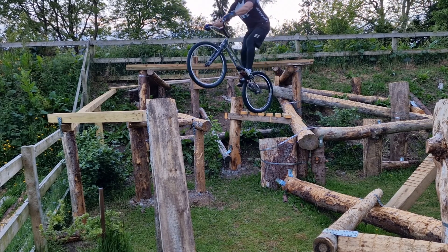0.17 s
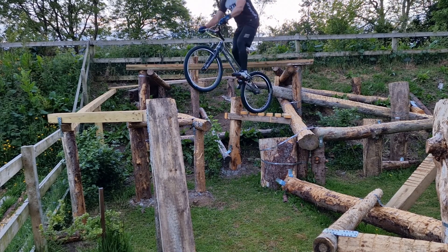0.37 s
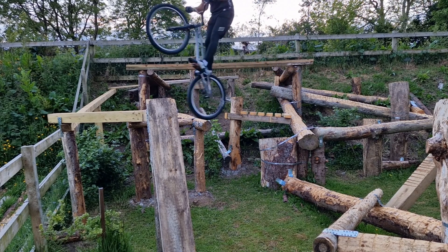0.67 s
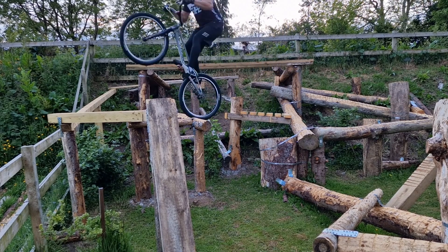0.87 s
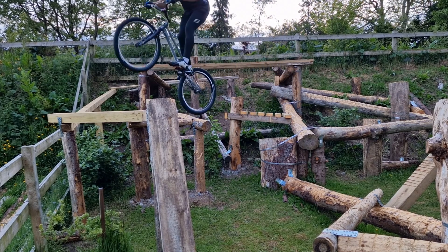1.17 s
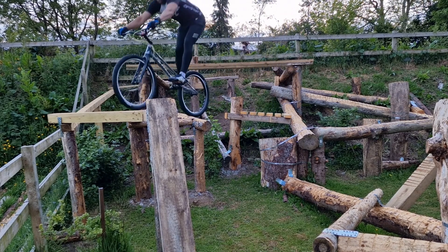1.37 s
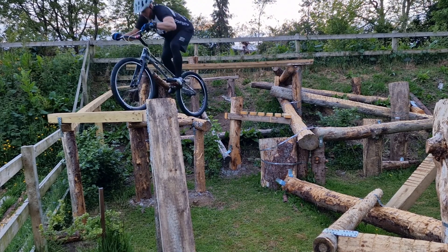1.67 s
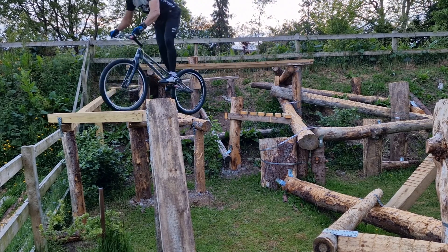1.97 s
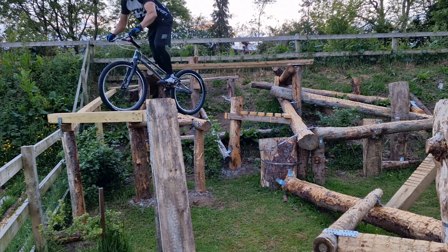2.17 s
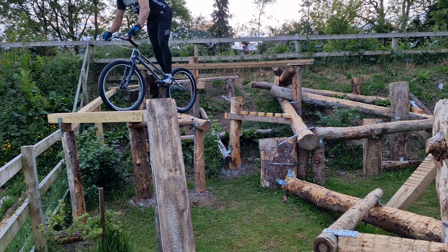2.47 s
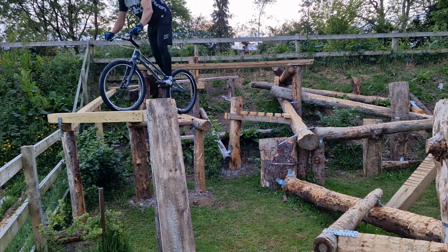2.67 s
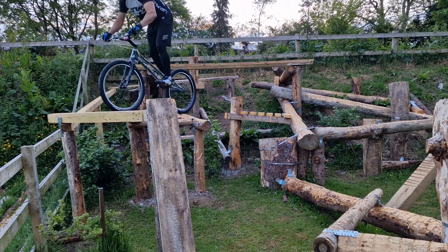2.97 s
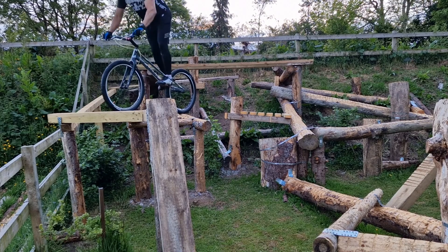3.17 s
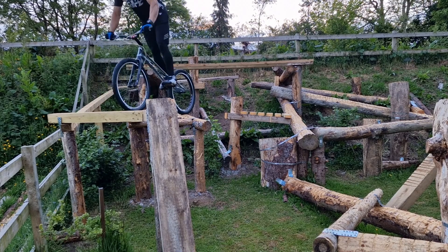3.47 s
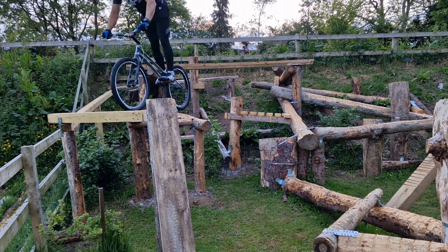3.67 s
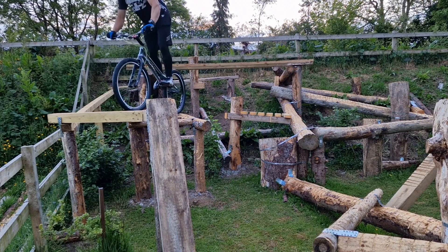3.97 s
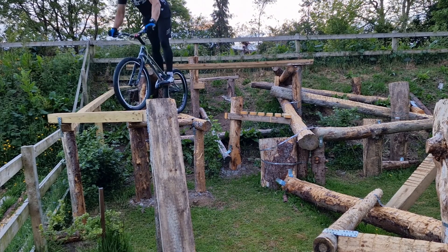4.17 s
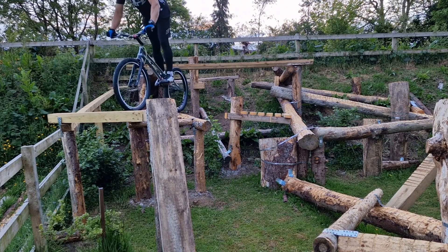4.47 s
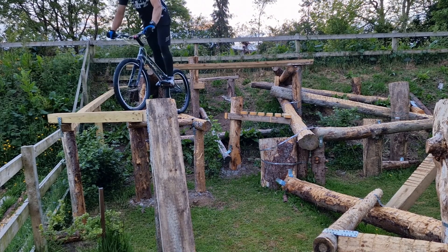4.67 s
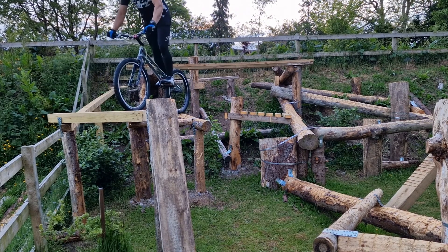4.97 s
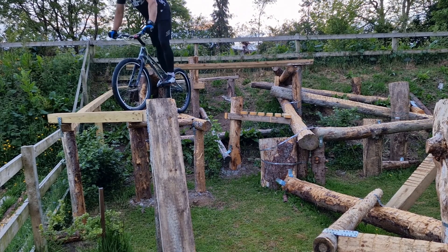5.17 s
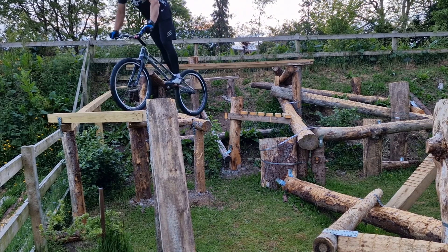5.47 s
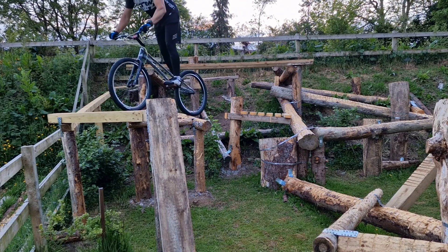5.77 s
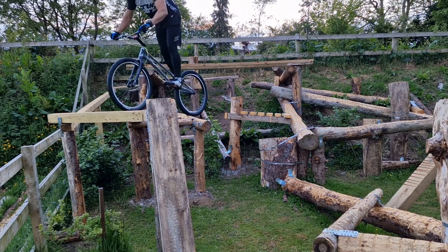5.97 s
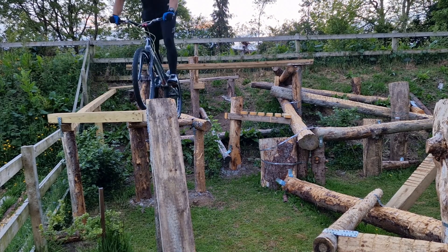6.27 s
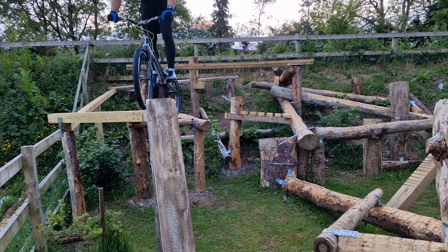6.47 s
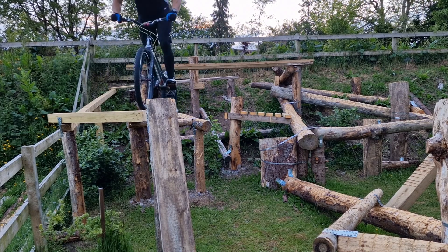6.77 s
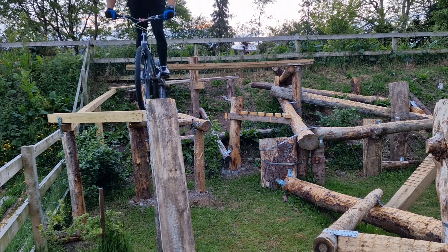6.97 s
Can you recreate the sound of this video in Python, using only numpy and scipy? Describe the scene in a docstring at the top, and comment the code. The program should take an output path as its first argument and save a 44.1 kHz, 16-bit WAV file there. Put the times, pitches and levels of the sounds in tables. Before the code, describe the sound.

Bike tyres thump and scuff on timber amid ratchet clicks and brief brake squeaks, with birdsong and soft leaves in a garden.

```python
"""A trials bicycle hops along timber beams in a garden. Over far traffic and leaves, the tyres thump and scuff
on wood and the freewheel ticks; a pedal kick spins it into a whirr, cut off as the rim brakes grab and honk.
From 1.1 s a songbird sings gliding notes between the hops, with a high trill around 3 s. The hardest landing
comes at 5.6 s: a honk, a sharp slap of the chain, a scuff and a ringing beam. From 6.2 s a far engine hums,
under the last hops and a stutter of brakes."""
import sys
import numpy as np
from scipy import signal
from scipy.fft import rfft, irfft, next_fast_len
from scipy.io import wavfile

SR = 44100
rng = np.random.default_rng(int(sys.argv[2]) if len(sys.argv) > 2 else 0)


def wav_out(sig):
    """Save sig, one row per channel (or a flat mono array), as 16-bit PCM at SR to the path in sys.argv[1]."""
    wavfile.write(sys.argv[1], SR, np.round(np.clip(np.atleast_2d(sig).T, -1, 1) * 32767).astype(np.int16))


N = 313992
T = np.arange(N) / SR
SIDES = np.array([[1], [-1]])   # adds to the left, subtracts from the right


def from_db(db):
    """Decibels to gain."""
    return 10 ** (np.asarray(db) / 20)


def at_hz(curve, hz):
    """Read a curve on a log frequency axis."""
    curve_hz, values = np.transpose(curve)
    return np.interp(np.log(hz), np.log(curve_hz), values)


def filtered(x, order, hz, kind):
    """Butterworth filter."""
    return signal.sosfilt(signal.butter(order, hz, kind, fs=SR, output="sos"), x)


def noise(eq):
    """Noise of unit power, coloured by a minimum-phase EQ."""
    hz = np.maximum(np.arange(4097) * SR / 8192, 10)
    cepstrum = irfft(at_hz(eq, hz) * np.log(10) / 20)
    cepstrum[1:4096] *= 2
    cepstrum[4097:] = 0
    kernel = irfft(np.exp(rfft(cepstrum)))
    return signal.fftconvolve(rng.standard_normal(N), kernel / np.sqrt(np.sum(kernel ** 2)))[:N]


def drift(per_s):
    """Random modulator: ramps between values of spread 1."""
    knots = np.arange(0, T[-1] + 1, 1 / per_s)
    return np.interp(T, knots, rng.standard_normal(N // 20)[:len(knots)])


def decays(times, levels_db, t60, attack_s):
    """Sum of envelopes with a quick attack and an exponential decay."""
    out, t = np.zeros(N + SR), T[:int(1.5 * t60 * SR)]
    for s, level_db in zip(times, levels_db):
        out[round(s * SR):][:len(t)] += (1 - np.exp(-t / attack_s)) * from_db(level_db - 60 * t / t60)
    return out[:N]


def struck(modes, times, levels_db, tunings, attack_s):
    """Each blow rings every mode at a strength of its own; its tuning multiplies the mode pitches."""
    out, spread_db = np.zeros(N), rng.normal(0, 3.4, (len(times), len(modes)))
    for s, level_db, tuning, extras_db in zip(times, levels_db, tunings, spread_db):
        i = round(s * SR)
        t = T[:min(N - i, SR // 2)]
        for (pitch, mode_db, t60), extra_db in zip(modes, extras_db):
            envelope = from_db(level_db + mode_db + extra_db - 60 * t / t60) * (1 - np.exp(-t / attack_s))
            out[i:i + len(t)] += envelope * np.sin(2 * np.pi * pitch * tuning * t)
    return out


# Faders of the background bed: t/s, rumble level/dB, rustle level/dB
BED_FADERS = [(0.0, -62, -68), (0.46, -65, -65.5), (0.77, -60, -68.5), (1.76, -66, -69.5), (5.23, -64, -75),
              (6.84, -61, -69), (7.12, -65.5, -73)]
# EQ of the traffic rumble: f/Hz, level/dB
TRAFFIC_EQ = [(12, -44.5), (20, -2.5), (70, -3), (103, -12), (134, -16), (167, -31), (250, -29.5),
              (320, -58), (550, -120)]
# EQ of the leaf rustle: f/Hz, level/dB
LEAF_EQ = [(88, -10.5), (150, -11), (475, -8), (566, -10), (649, -10.5), (1310, -10.5), (6020, -28.5),
           (7470, -17.5), (9080, -37), (16000, -38.5)]
def traffic_and_leaves():
    """Far traffic rumbles almost in mono; leaves rustle wide, unrelated on the two sides."""
    s, rumble_db, rustle_db = np.transpose(BED_FADERS)
    rumble = noise(TRAFFIC_EQ) + 0.17 * noise(TRAFFIC_EQ) * SIDES
    rumble *= from_db(np.interp(T, s, rumble_db) + 0.97 * drift(16))
    rustle = np.array([noise(LEAF_EQ), noise(LEAF_EQ)])
    rustle *= from_db(np.interp(T, s, rustle_db) + 2.5 * drift(18))
    return rumble + rustle


# Tyres meeting timber: t/s, thump level/dB, thump f/Hz, scuff level/dB
TYRE_HITS = [(.037, -38.5, 122.8, -40), (0.458, -58, 80, -46.5), (0.568, -39.5, 124.4, -39.5),
             (.827, -38, 71.8, -32.5), (1.464, -49, 77, -34.5), (1.516, -31, 80.8, -39),
             (1.551, -38, 77.1, -39.5), (1.909, -56, 64.5, -44), (2.109, -44, 63, -33.5),
             (2.387, -58.5, 62.6, -48), (2.618, -40.5, 108.5, -44.5), (2.95, -67.5, 80, -61.5),
             (3.17, -67.5, 80, -57), (3.331, -56, 74.7, -45.5), (3.489, -37.5, 108.7, -36.5),
             (3.559, -43.5, 69.4, -42), (3.93, -42.5, 109.8, -44.5), (4.279, -76, 100, -44),
             (4.308, -50, 93, -64.5), (4.391, -64, 90, -61), (4.69, -47.5, 87.3, -56),
             (5.149, -70, 73.2, -61), (5.288, -73, 76, -57), (5.609, -39, 73.7, -21.5),
             (6.256, -46.5, 84.6, -43), (6.33, -42, 82.3, -48), (6.438, -49.5, 92, -51),
             (6.682, -37, 91.6, -28), (6.984, -46, 82.8, -46.5)]
# Modes of the logs: multiple of the thump pitch, level/dB, t60/s
LOG_MODES = [(.62, -4.5, 0.092), (.8, -5.5, 0.35), (1.0, -3.5, 0.22), (1.35, -1.5, .12), (1.9, -10, 0.16),
             (2.7, -15, 0.066)]
# EQ of rubber scuffing on wood: f/Hz, level/dB
SCUFF_EQ = [(120, -30), (200, -15), (579, -10), (777, -11.5), (3900, -9.5), (7830, -24), (11100, -29),
            (14900, -42), (16000, -28)]
def tyres():
    """A soft push rings the logs; the rubber scuffs, its bright edge ahead of its body."""
    s, thump_db, thump_hz, scuff_db = np.transpose(TYRE_HITS)
    thumps = struck(LOG_MODES, s, thump_db, thump_hz, attack_s=0.0029)
    rub = noise(SCUFF_EQ) * from_db(3.8 * np.clip(drift(120), -2, 2))
    low = filtered(rub, 2, 1800, "low")
    body = low * decays(s, scuff_db, t60=0.19, attack_s=0.016)
    edge = (rub - low) * decays(s, scuff_db - 8, t60=0.19, attack_s=0.0012)
    return thumps + body + edge


# EQ of the hub's metal: f/Hz, level/dB
HUB_EQ = [(290, -60), (500, -35.5), (729, -19), (843, -31.5), (1090, -25), (1380, -9), (1690, -11),
          (2890, 4), (3980, -3), (7530, -6), (10800, -4), (14900, -9), (16000, -10.5)]
def hub_noise():
    """The metallic hiss from which the ticks and the whirr are cut."""
    return noise(HUB_EQ)


def ticks(hiss, hits, top_db, body_db, t60):
    """Short bursts of hiss in three bands; top and body are trimmed against the middle."""
    s, level_db = np.transpose(hits)
    usual_db, body_follows = -37, 0.74   # the body follows only a share of a tick's strength
    body_level_db = usual_db + body_follows * (level_db - usual_db) + body_db
    body = filtered(hiss, 4, 4000, "low") * decays(s, body_level_db, t60, attack_s=0.000093)
    middle = filtered(hiss, 4, [4000, 10200], "band") * decays(s, level_db, t60, attack_s=0.00045)
    top = filtered(hiss, 6, 10200, "high") * decays(s, level_db + top_db, t60, attack_s=0.00099)
    return body + middle + top


# Freewheel pawls dropping over a tooth: t/s, level/dB
PAWL_DROPS = [(0.049, -35), (.072, -37), (0.0925, -32.5), (.1117, -37), (0.13, -37), (.1417, -33),
              (0.162, -38), (.173, -32.5), (0.1884, -34), (.2072, -38), (.2289, -30.5), (0.258, -36.5),
              (0.3236, -39.5), (0.5253, -54), (1.297, -37.5), (1.3264, -35), (1.3481, -34), (1.3736, -37),
              (1.4, -33), (1.4456, -39), (1.499, -37), (1.8641, -38.5), (2.0687, -50), (2.1204, -34.5),
              (3.5034, -36.5), (3.529, -40.5), (3.848, -43), (4.134, -45), (6.6363, -43.5), (7.006, -38.5),
              (7.045, -38), (7.0824, -41.5)]
def freewheel_ticks(hiss):
    """Bright double ticks: a second, softer pawl drops just after the first."""
    second_drops = [(s + 0.0048, level_db - 5) for s, level_db in PAWL_DROPS]
    return ticks(hiss, PAWL_DROPS + second_drops, top_db=1, body_db=-3.5, t60=0.028)


# Ticks of the chain and frame: t/s, level/dB
LOAD_TICKS = [(.39, -53.5), (.433, -50), (.457, -36), (.465, -40), (.484, -37.5), (.562, -49.5),
              (1.488, -45.5), (1.5472, -43), (1.5953, -45), (1.6216, -42.5), (1.63, -44.5), (1.6697, -43),
              (2.3216, -57), (2.37, -56), (2.39, -47), (2.5034, -66), (2.603, -43), (2.628, -40.5),
              (2.7879, -67), (2.9464, -53.5), (2.9672, -54.5), (3.1592, -59.5), (3.1877, -56),
              (3.3079, -50.5), (3.5606, -42), (3.714, -51.5), (3.9345, -46), (4.0103, -53), (4.2708, -42.5),
              (4.385, -62), (4.553, -59), (4.5705, -54), (4.7, -56.5), (5.015, -60.5), (5.3448, -57),
              (5.4889, -51.5), (5.6167, -18), (5.698, -36), (6.2167, -59), (6.2454, -51.5), (6.4274, -52.5),
              (6.536, -58.5), (6.572, -50), (6.8962, -58.5)]
def chain_and_frame(hiss):
    """Chain and frame tick dully under load."""
    return ticks(hiss, LOAD_TICKS, top_db=-22.5, body_db=1.5, t60=0.035)


# Blows on the hollow beam: t/s, level/dB
BEAM_HITS = [(.49, -70.5), (1.462, -70.5), (1.512, -70), (1.911, -77), (2.11, -75), (3.331, -77),
             (3.93, -77.5), (4.385, -78), (5.607, -53), (6.258, -76.5), (6.33, -77), (6.439, -76.5),
             (6.683, -75.5), (6.982, -74)]
# Modes of the beam: f/Hz, level/dB, t60/s
BEAM_MODES = [(259, -2, 0.08), (306.4, 13, 0.55), (365, 9, 0.24), (456, 0, 0.097), (564, 0, 0.84)]
def hollow_beam():
    """The tyre rings a hollow beam at its own pitches; the level flutters."""
    s, level_db = np.transpose(BEAM_HITS)
    return struck(BEAM_MODES, s, level_db, np.ones(len(s)), attack_s=0.003) * from_db(4.5 * drift(55))


# Freewheel spinning under a pedal kick: t/s, tick rate/Hz, level/dB
PEDAL_KICK = [(.618, 190, -73.5), (.624, 270, -39), (0.691, 320, -36.5), (.80, 360, -38), (0.818, 450, -80)]
def freewheel_whirr(hiss):
    """Spinning fast, the pawls merge into a grainy whirr."""
    s, tick_hz, level_db = np.transpose(PEDAL_KICK)
    teeth_passed = np.cumsum(np.interp(T, s, tick_hz) * (1 + 0.3 * drift(90))) / SR
    grain = 0.5 + from_db(-14 * (teeth_passed % 1))   # each tooth rings into the next
    grain /= np.sqrt(np.mean(grain ** 2))
    return hiss * grain * from_db(np.interp(T, s, level_db, -200, -200))


# Brake grabs: t/s, bite/s, hold/s, level/dB, first f/Hz, last f/Hz, overtone tilt/dB,
# rasp against the tone/dB, treble against the rasp/dB
BRAKE_GRABS = [(.81, 0.0083, .024, -5.5, 1197, 1179, -4.5, -9, -3),
               (2.073, 0.0076, 0.026, -36.5, 822, 832, -20, 1, -19),
               (2.085, .009, 0.026, -34.5, 1059, 1074, -16, -11, -15),
               (2.602, 0.0023, 0.0072, -31.5, 882, 890, -25, -5, -8),
               (5.548, 0.0099, 0.014, -14, 809, 699, -9.5, -5.5, 8),
               (5.598, .004, 0.013, -31, 688, 750, -5, 4, -2),
               (6.576, 0.0087, 0.027, -30.5, 726, 695, -15, -3.5, -13.5),
               (6.62, 0.0037, 0.026, -35.5, 595, 613, -22, -15, -9),
               (6.642, 0.021, 0.013, -28.5, 747, 815, -15, -7.5, -14),
               (6.680, 0.0091, 0.0026, -15, 933.5, 992, -5.5, -10.5, -13),
               (6.707, .002, 0.0094, -34, 947, 940, -7, -8, -5)]
# EQ of a pad rasping on the rim: f/Hz, level/dB
PAD_EQ = [(200, -39.5), (500, -33.5), (900, -10.5), (1500, -16), (2600, -3), (3600, -4), (5400, -10),
          (7900, -11), (10500, -19), (14500, -24.5), (16000, -33.5)]
# Modes of the rim: f/Hz, level/dB, t60/s
RIM_MODES = [(880, -33.5, 0.15), (1472, -26.5, 0.1), (3290, -28, 0.098)]
def brakes():
    """Pads stick and slip on the rim: a brief unsteady harmonic honk, a rasp, and the rim ringing on."""
    sag_db, release_t60, pitch_wobble = -9.5, 0.045, 0.022   # pads slacken as they grip, then let go
    honk, rasp_gain, treble_gain = np.zeros((3, N))
    t, harmonic = T[:int(0.25 * SR)], np.arange(1, 6)[:, None]
    knots = np.linspace(0, t[-1], 80)
    for s, bite, hold, level_db, first_hz, last_hz, tilt_db, rasp_db, treble_db in BRAKE_GRABS:
        span = slice(round(s * SR), round(s * SR) + len(t))
        release_db = -60 * np.maximum(t - bite - hold, 0) / release_t60
        grip = from_db(level_db + np.interp(t, [0, bite, bite + hold], [-30, 0, sag_db]) + release_db)
        jitter = np.array([np.interp(t, knots, row) for row in rng.standard_normal((11, 80))])
        slip_hz = np.interp(t, [0, bite, bite + hold + 0.007], [0.9 * first_hz, first_hz, last_hz])
        phase = 2 * np.pi * np.cumsum(slip_hz * (1 + pitch_wobble * jitter[10])) / SR
        flutter_db = jitter[:5] * np.where(harmonic > 1, 3.5, 1.2)
        gains = from_db(tilt_db * (harmonic - 1) ** 1.1 + flutter_db)
        smear = 0.39 * (harmonic - 1) * jitter[5:10]   # ragged slips smear the high overtones most
        honk[span] += grip * np.sum(gains * np.sin(harmonic * phase + harmonic ** 2 + smear), axis=0)
        pulses = grip * from_db(rasp_db) * (1 + 0.5 * np.sin(phase))
        rasp_gain[span] += pulses
        treble_gain[span] += pulses * from_db(treble_db)
    hiss = noise(PAD_EQ)
    rasp = rasp_gain * filtered(hiss, 4, 4300, "low") + treble_gain * filtered(hiss, 4, 4300, "high")
    friction = rasp_gain * rng.standard_normal(N)
    rim = sum(from_db(level_db - 7) * ring(friction, hz, t60) for hz, level_db, t60 in RIM_MODES)
    return honk + rasp + rim


def ring(x, hz, t60):
    """One resonance: a unit click rings as a dying sine of height 1."""
    r, w = from_db(-60 / (t60 * SR)), 2 * np.pi * hz / SR
    return signal.lfilter([0, np.sin(w)], [1, -2 * r * np.cos(w), r * r], x + 1e-18)


# The songbird's notes: t/s, length/s, first f/Hz, last f/Hz, level/dB
BIRD_NOTES = [(1.11, 0.0095, 4320, 4120, -61.5), (1.135, 0.032, 5780, 3880, -49),
              (1.161, .02, 5400, 3434, -49.5), (1.190, 0.0059, 4200, 3500, -53),
              (1.247, 0.0038, 3600, 3270, -48), (1.591, 0.054, 3800, 3990, -54),
              (1.705, 0.014, 3700, 4150, -56), (1.726, 0.028, 3620, 3924, -49),
              (1.753, 0.016, 5760, 4910, -50), (1.777, .016, 5620, 4950, -61),
              (1.789, 0.14, 6900, 7430, -62), (1.826, 0.03, 3780, 4000, -59),
              (1.862, 0.023, 3670, 3800, -53), (1.881, 0.088, 5260, 5210, -54.5),
              (1.924, 0.064, 4000, 4430, -54.5), (1.965, 0.011, 3840, 3360, -48),
              (2.018, 0.027, 3620, 2910, -53), (2.052, 0.032, 3000, 3950, -41),
              (2.153, 0.025, 3500, 3185, -50), (2.19, 0.1, 2450, 2766, -59.5),
              (2.291, .016, 3900, 3204, -48.5), (2.339, .22, 3250, 3390, -58),
              (2.356, 0.16, 3660, 3700, -65), (3.446, 0.063, 4250, 4670, -41),
              (3.532, 0.072, 5200, 5100, -44.5), (3.631, 0.054, 4760, 4608, -39.5),
              (3.748, 0.021, 3000, 3604, -50.5), (3.765, .073, 2450, 2440, -65),
              (3.784, 0.017, 3100, 3600, -48.5), (3.819, 0.015, 3640, 3230, -50),
              (3.895, 0.015, 4000, 3420, -45), (3.917, 0.017, 3400, 3903, -38.5),
              (3.959, .031, 3760, 3760, -57), (3.986, 0.02, 3890, 4097, -42),
              (4.002, 0.026, 3250, 3680, -47.5), (4.018, 0.014, 4690, 4280, -48.5),
              (4.028, 0.019, 3400, 3940, -35.5), (4.055, .017, 4000, 2730, -55),
              (4.084, 0.042, 2650, 3845, -42.5), (4.186, 0.01, 3370, 3100, -53.5),
              (4.234, 0.043, 2800, 3490, -50.5), (4.336, 0.018, 3600, 3850, -56),
              (4.38, 0.016, 3550, 3710, -57.5), (5.033, 0.039, 3600, 3505, -70.5),
              (5.137, 0.045, 3480, 3940, -70.5), (5.27, 0.02, 3600, 3550, -68.5),
              (5.4, 0.18, 7500, 7930, -67.5), (5.427, .044, 7300, 5750, -64),
              (5.496, 0.042, 6300, 6600, -56), (5.872, 0.059, 3264, 4750, -52),
              (5.982, 0.08, 4450, 4743, -54), (6.2, .1, 2900, 2816, -56), (6.203, 0.05, 3610, 3760, -58.5),
              (6.243, 0.046, 3850, 3250, -49.5), (6.431, 0.027, 3880, 3300, -50.5),
              (6.494, 0.032, 3750, 3850, -49.5), (6.536, 0.047, 3540, 3180, -55.5)]
def bird_notes():
    """Whistled, slightly wavering sines, each gliding fast and settling on its last pitch."""
    out, waver = np.zeros(N), 1 + 0.021 * drift(200)
    for s, length, first_hz, last_hz, level_db in BIRD_NOTES:
        i, n = round(s * SR), int(length * SR)
        progress = np.arange(n) / n
        hz = (last_hz + (first_hz - last_hz) * (1 - progress) ** 2.5) * waver[i:i + n]
        envelope = from_db(level_db) * np.sin(np.pi * progress) ** 0.6
        out[i:i + n] += envelope * np.sin(2 * np.pi * np.cumsum(hz) / SR)
    return out


# Course of the high trill: t/s, centre f/Hz, sweep/Hz, level/dB
TRILL_CURVE = [(2.654, 7440, 202, -43.5), (2.73, 7410, 300, -49), (2.845, 6710, 900, -50),
               (2.949, 7060, 856, -50.5), (3.08, 6926, 917, -51), (3.25, 6540, 910, -48),
               (3.381, 6405, 450, -47), (3.485, 6320, 303, -65)]
def bird_trill():
    """Quick falling chirps swell in slowing surges, each surge sung louder and lower."""
    chirps_per_s, surges_per_s, slowing_per_s2 = 67, 13.96, 10.37
    surge_db, dip_share = 5.5, 0.183
    s, centre_hz, sweep_hz, level_db = np.transpose(TRILL_CURVE)
    progress = np.cumsum(chirps_per_s * (1 + 0.2 * drift(30))) / SR % 1
    since = T - 2.698   # seconds from the crest of the first surge
    surge = np.cos(2 * np.pi * (surges_per_s * since - slowing_per_s2 * since ** 2 / 2))
    hz = np.interp(T, s, centre_hz) + np.interp(T, s, sweep_hz) * (0.5 - progress - dip_share * surge)
    swell = from_db(np.interp(T, s, level_db, -200, -200) + surge_db * surge)
    return swell * np.sin(np.pi * progress) ** 0.5 * np.sin(2 * np.pi * np.cumsum(hz) / SR)


# Hum of a far engine: t/s, f/Hz, level/dB
ENGINE_HUM = [(6.19, 86.4, -84), (6.209, 83.3, -53), (6.6, 87.2, -52.5), (7.12, 91, -58.5)]
def far_engine():
    """A distant engine, heard as one low sine wavering in pitch and level."""
    s, hz, level_db = np.transpose(ENGINE_HUM)
    phase = 2 * np.pi * np.cumsum(np.interp(T, s, hz) * (1 + 0.0314 * drift(31))) / SR
    return from_db(np.interp(T, s, level_db, -200) + 4.4 * np.clip(drift(15), -1, 1)) * np.sin(phase)


# Decay of the garden reverb: f/Hz, t60/s before decay_scale
GARDEN_DECAY = [(100, 0.55), (900, 0.77), (1800, 0.74), (3000, 0.6), (8000, 0.49), (16000, 0.48)]
def garden(x, predelay_s, decay_scale):
    """Fences and hedges scatter the sound: a tail dying band by band, near mono in the bass."""
    t, tail = T[:SR], 0
    white, edges = rng.standard_normal((2, len(t))), 40 * 2.0 ** np.arange(10)
    for low, high in zip(edges, edges[1:]):
        mid, side = filtered(white, 2, [low, high], "band")
        band = mid + min(high / 1500, 1) * side * SIDES
        t60 = decay_scale * at_hz(GARDEN_DECAY, np.sqrt(low * high))
        tail = tail + band * from_db(-60 * t / t60)
    tail *= np.clip(t / predelay_s - 1, 0, 1)
    tail *= 1 + 5.8 * np.exp(-t / 0.01)   # the nearest posts answer loudest
    tail /= np.sqrt(np.sum(tail ** 2) / 2)
    return signal.fftconvolve(x[None], tail, axes=1)[:, :N]


def panned(x, lag_s, left_db):
    """Place a source: the right side hears it later; left_db is left against right."""
    size = next_fast_len(N)
    delay = np.exp(-2j * np.pi * np.fft.rfftfreq(size, 1 / SR) * lag_s)
    late = irfft(rfft(x, size) * delay, size)[:N]
    return np.array([x * from_db(left_db / 2), late * from_db(-left_db / 2)])


def scene():
    """Bicycle near the centre and bird to the right, each with its reverb, over the background."""
    bed, hiss = traffic_and_leaves(), hub_noise()
    bike = tyres() + freewheel_ticks(hiss) + chain_and_frame(hiss)
    bike += hollow_beam() + freewheel_whirr(hiss) + brakes()
    bird = (bird_notes() + bird_trill()) * from_db(2 * drift(90))
    direct = panned(bike, lag_s=0.0001371, left_db=-0.4) + panned(bird, lag_s=0.000093, left_db=-8)
    reverb = from_db(-5) * garden(bike, predelay_s=0.0029, decay_scale=0.92)
    reverb += from_db(3) * garden(bird, predelay_s=0.0036, decay_scale=0.93)
    return bed + direct + reverb + far_engine()


def record(dry):
    """Master chain: a low cut, soft clipping of the highest peaks and a steep high cut."""
    dry = filtered(dry, 2, 38, "high")
    rounded = dry / (1 + np.abs(dry / 0.88) ** 6) ** (1 / 6)
    return signal.sosfilt(signal.cheby2(14, 70, 16480, fs=SR, output="sos"), rounded)


dry = scene()
out = record(dry)
wav_out(out)
```